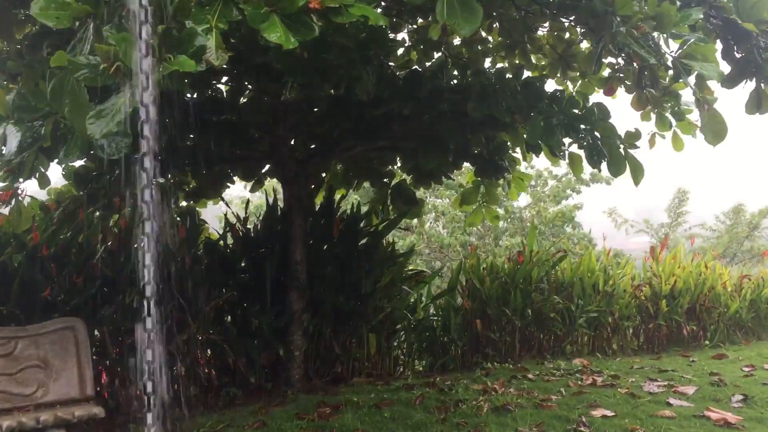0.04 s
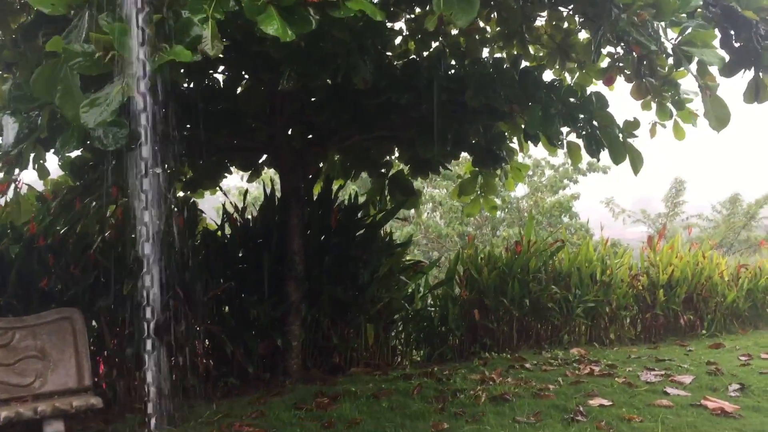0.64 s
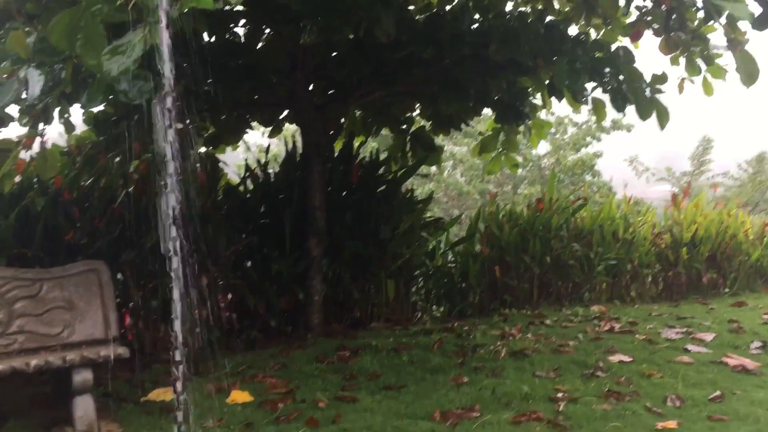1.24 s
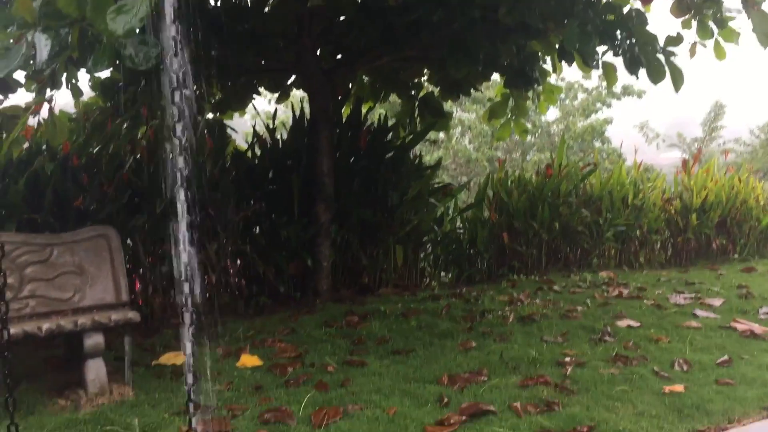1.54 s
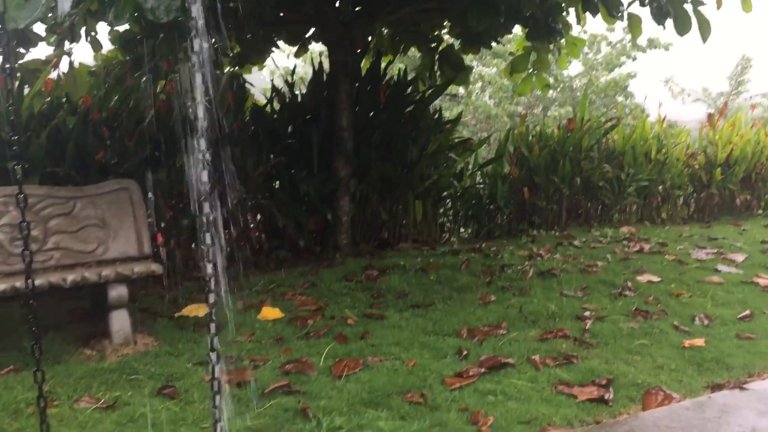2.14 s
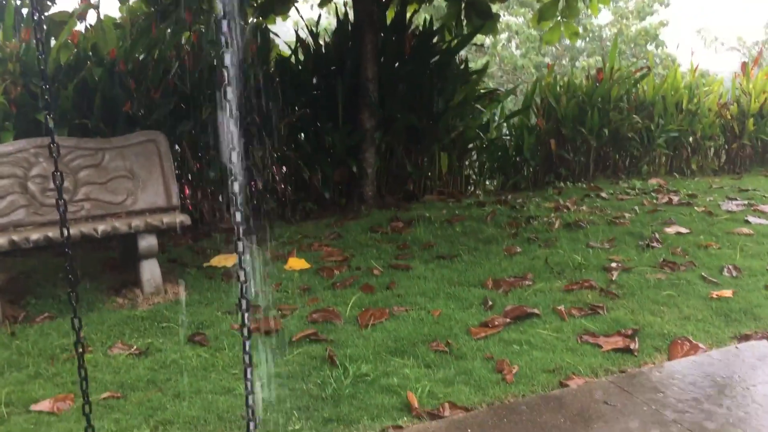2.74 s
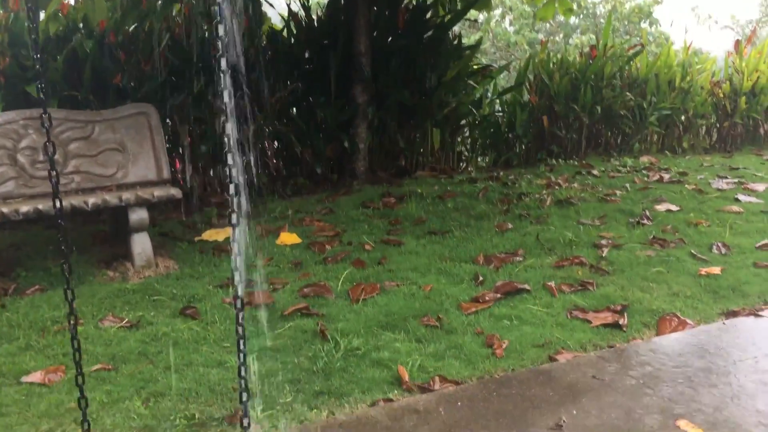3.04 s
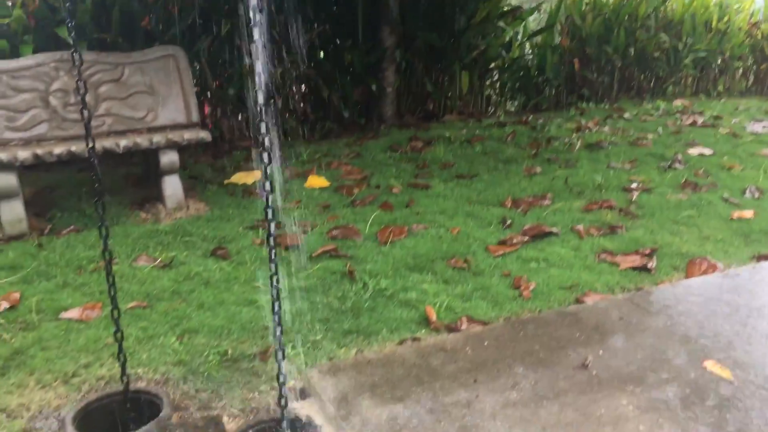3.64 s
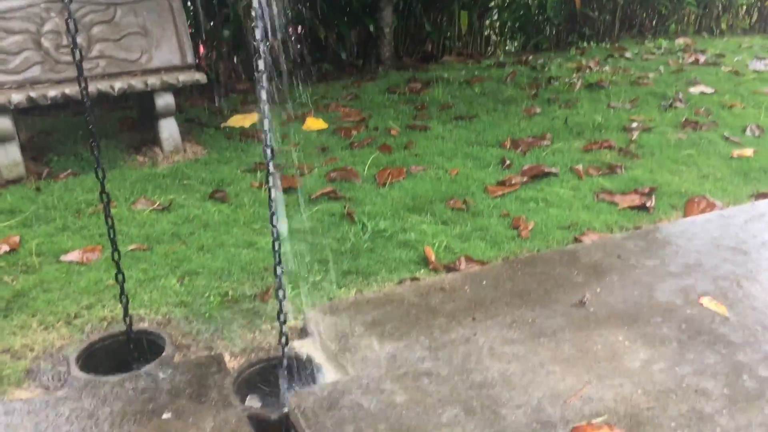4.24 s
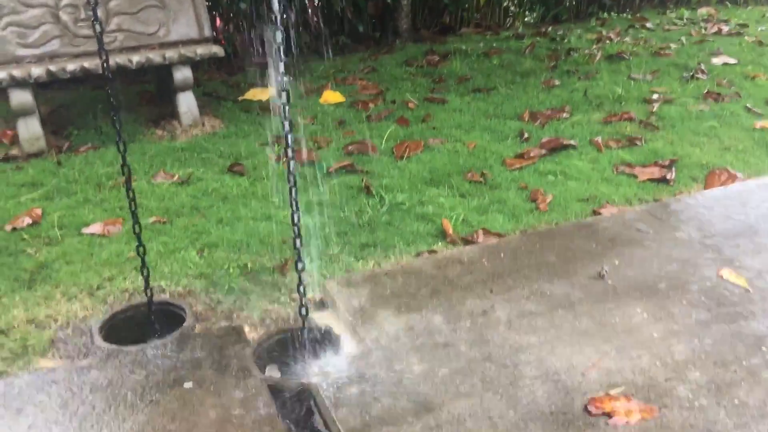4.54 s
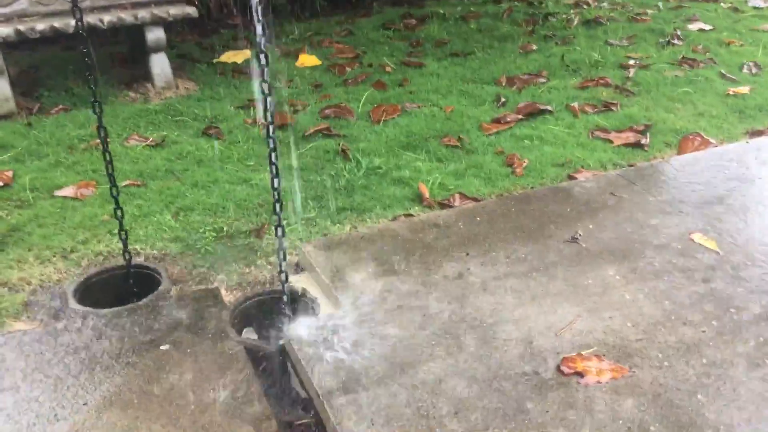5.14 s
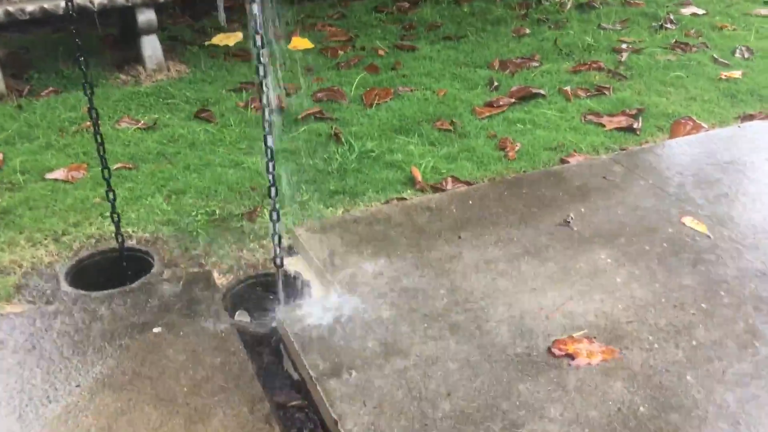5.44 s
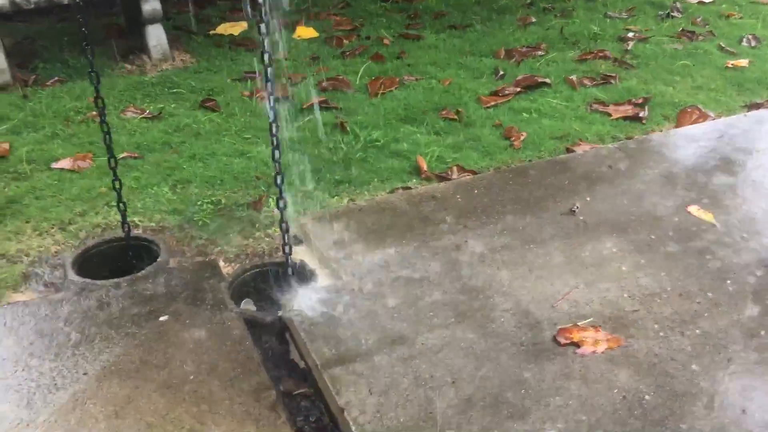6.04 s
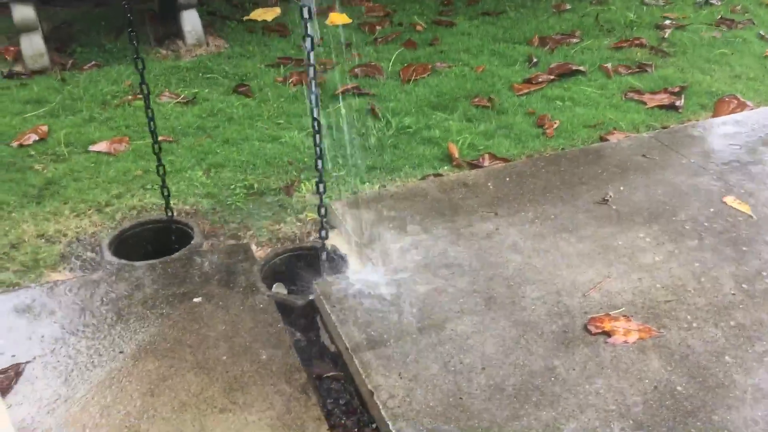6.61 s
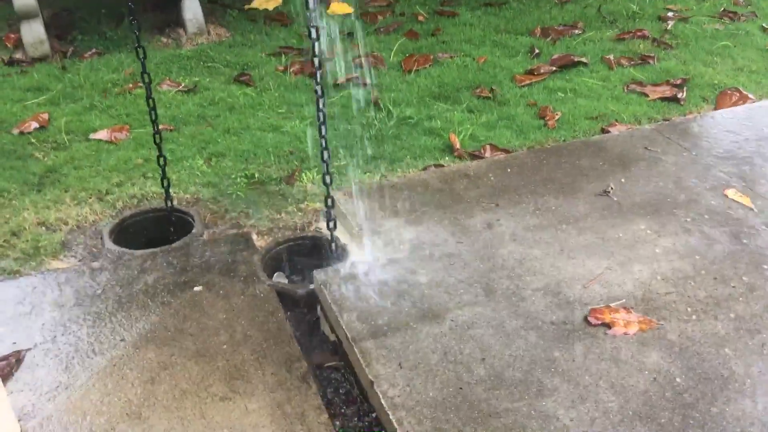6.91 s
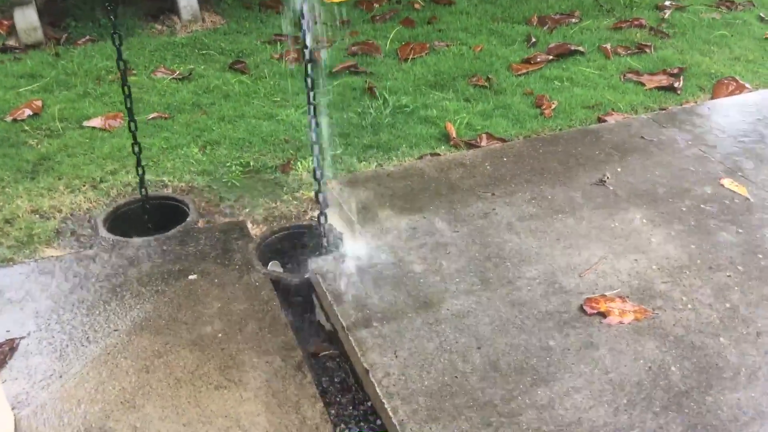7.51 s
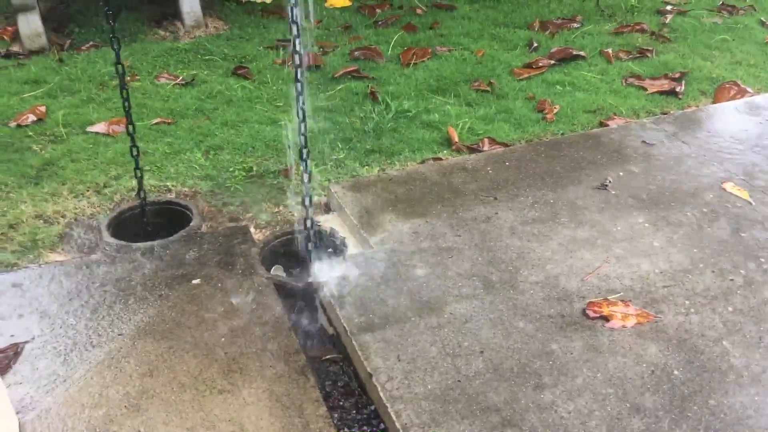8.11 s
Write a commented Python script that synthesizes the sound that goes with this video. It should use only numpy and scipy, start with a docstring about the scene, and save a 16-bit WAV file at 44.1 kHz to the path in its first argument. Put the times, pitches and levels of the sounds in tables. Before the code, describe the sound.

Heavy rain falls on a garden for the whole eight seconds or so, a steady wash of distant drops with nearer ones tapping on leaves and ticking on pavement. Close by, water pours down a rain chain and lands on concrete in quick, irregular wet slaps, each with a bright fizz of spray. Tiny drips and a few bubbly plinks sound in the standing water, mostly in the first two seconds. Between 2 and 3 seconds, light gusts bump the microphone with a low rumble. From about 3 seconds the microphone turns toward the foot of the chain, so the splatter becomes louder and denser by 5 to 6 seconds, while the garden rain fades slightly. Stronger gusts buffet the microphone in fluttering bursts from about 5 seconds, peaking near 8. The rain and splashing continue to the end.

```python
"""Heavy rain falls on a garden throughout: countless far drops merge into a wash, nearer ones tap on leaves
and pavement. Close by, water pours down a rain chain and breaks into blobs that slap the concrete, each
throwing a fizz of spray. After two seconds the first gusts buffet the microphone. From about three
seconds it turns down towards the splash, and the garden fades a little. The gusts return more strongly
from about five seconds and peak near eight."""
import sys
import numpy as np
from scipy import signal
from scipy.fft import rfft, irfft, next_fast_len
from scipy.io import wavfile
from scipy.ndimage import uniform_filter1d, map_coordinates

SR = 44100
rng = np.random.default_rng(int(sys.argv[2]) if len(sys.argv) > 2 else 0)


def log_audio(samples):
    """Write samples as a 16-bit WAV file to the path given in sys.argv[1]."""
    # one column per channel
    frames = np.atleast_2d(samples).T
    # limit to full scale, then quantise
    limited = np.clip(frames, -1, 1)
    pcm = np.round(limited * 32767).astype(np.int16)
    wavfile.write(sys.argv[1], SR, pcm)


N = 369116

# Spectrum of bursting blobs and their fine spray: (frequency [Hz], gain [dB])
TICK_SPECTRUM = [(500, -14), (1300, -9), (2500, -9), (5000, -2.5), (6800, -0.5), (8700, 4), (10800, 1.5),
                 (13300, 13), (16000, -2.5)]
# Spectrum of coarser drops splashing: (frequency [Hz], gain [dB])
SPLATTER_SPECTRUM = [(600, -24), (2000, -12), (3200, 0.5), (4000, 6.5), (5000, 10.5), (6300, -3),
                     (9000, -32), (16000, -25)]
# The microphone's turn from the garden to the foot of the chain: (time [s], facing the splash [0-1])
FACING = [(0, 0.12), (2.9, 0), (4.6, 0.82), (6.3, 1), (8.37, 1)]


def amp(db):
    """Decibels to amplitude ratio."""
    return 10 ** (np.asarray(db) / 20)


def unit(x):
    """Each row normalised to rms 1."""
    return x / np.sqrt(np.mean(x ** 2, axis=-1, keepdims=True) + 1e-20)


def curve(rows):
    """Linear interpolation of (time [s], value) rows at every sample."""
    return np.interp(np.arange(N) / SR, *np.transpose(rows))


def facing(times):
    """Orientation of the microphone at these times: 0 towards the garden, 1 towards the splash."""
    return np.interp(times, *np.transpose(FACING))


def wobble(rate):
    """Smooth random modulation: a spline through rate knots a second."""
    return map_coordinates(rng.standard_normal(int(N * rate / SR) + 4), [np.arange(N) * rate / SR])


def filtered(x, response):
    """Linear filtering: the spectrum of each row is multiplied by a frequency response."""
    length = x.shape[-1]
    padded = next_fast_len(length + min(length, SR // 4))
    return irfft(rfft(x, padded) * response(np.fft.rfftfreq(padded, 1 / SR)), padded)[..., :length]


def coloured(x, spectrum):
    """Spectral shaping by (frequency [Hz], gain [dB]) points, normalised to rms 1."""
    points_hz, level = np.transpose(spectrum)
    return unit(filtered(x, lambda hz: amp(np.interp(np.log(hz + 1), np.log(points_hz), level))))


def placed(times, rows):
    """Superposition of short sounds, one a row, each starting at its time."""
    at = np.maximum(np.round(times * SR).astype(int), 0)[:, None] + np.arange(rows.shape[1])
    return np.bincount(at.ravel(), rows.ravel(), N)[:N]


def rush(patchy_db):
    """Noise modulated in random patches of time and frequency."""
    spectra = signal.stft(rng.standard_normal(N), nperseg=512)[2]
    patches = uniform_filter1d(rng.standard_normal(spectra.shape), size=6, axis=0)
    patches = uniform_filter1d(patches, size=12, axis=1)
    return signal.istft(spectra * amp(patchy_db * patches / patches.std()), nperseg=512)[1][:N]


def drops(rate, centre_hz, octaves, cycles, scatter_db, size):
    """Shot noise: rate random impacts a second, each a damped sinusoid size samples long."""
    when, pitch, weight, phase = rng.random((int(rate * N / SR), 4)).T
    hz = np.minimum(centre_hz * 2 ** (octaves * (2 * pitch - 1)), SR / 2)[:, None]
    turns = hz * np.arange(size) / SR
    gain = amp(-scatter_db * np.log(weight + .01))[:, None]
    envelope = np.exp(-turns / cycles) * (1 - np.exp(-2 * turns))
    ping = np.sin(2 * np.pi * (turns + phase[:, None])) * envelope
    return unit(placed(when * N / SR, gain * ping))


def rain():
    """Far impacts add incoherently into a wash; near ones tap leaves, plink in puddles, tick on paving."""
    wash_spectrum = [(25, -8), (100, -6), (260, -5.5), (450, -2), (680, -2.5), (950, 1), (1400, 1),
                     (1900, -1), (3000, -3.5), (5000, -6.5), (7000, -10), (16000, -24)]  # far rain on leaves and lawn: (frequency [Hz], gain [dB])
    wash = amp(-40 + 0.18 * wobble(6.3)) * coloured(rush(patchy_db=1.2), wash_spectrum)
    leaves = drops(rate=450, centre_hz=1437, octaves=1.08, cycles=1.3, scatter_db=-0.5, size=640)
    plinks = drops(rate=53, centre_hz=2190, octaves=1.224, cycles=11, scatter_db=1.5, size=1024)
    pavement = drops(rate=410, centre_hz=6200, octaves=0.92, cycles=0.43, scatter_db=5.5, size=96)
    garden = wash + amp(-52.5) * leaves + amp(-59) * plinks
    return amp(-1.1 * curve(FACING)) * garden + amp(-52) * pavement


def gust_envelope(start, length, level, rise_s=0.018, fall_s=0.036):
    """Each gust rises exponentially, holds and decays; the strongest at any moment sets the amplitude."""
    t = np.arange(0, N, 128) / SR
    age = t - start[:, None]
    shape = np.exp(np.minimum(age, 0) / rise_s - np.maximum(age - length[:, None], 0) / fall_s)
    return np.interp(np.arange(N) / SR, t, np.max(amp(level)[:, None] * shape, axis=0))


def wind():
    """Turbulence at the microphone port: gusts rumble and shed eddies that flutter higher and faster."""
    rumble_spectrum = [(12, -13), (28, 0.5), (55, 0), (100, -8), (200, -26.5), (400, -45), (2000, -85)]  # buffeting pressure: (frequency [Hz], gain [dB])
    eddy_spectrum = [(40, -16), (75, -2.5), (130, 1), (190, -2), (300, -11), (500, -23), (1500, -48)]  # small eddies: (frequency [Hz], gain [dB])
    gusts = [(2.125, 0.046, -50, -70), (2.22, 0.15, -56, -72), (2.577, 0.049, -51, -72),
             (2.755, 0.06, -45.5, -60), (2.835, 0.07, -43.5, -51), (3.64, 0.04, -53, -68),
             (4.85, 0.49, -48.5, -53.5), (5.244, 0.085, -38, -41.5), (5.343, 0.13, -39, -39),
             (5.539, 0.048, -39, -37.5), (5.643, 0.1, -41.5, -45), (5.863, 0.045, -36.5, -45),
             (5.962, 0.06, -40.5, -41.5), (6.33, 0.02, -45, -46), (6.408, 0.035, -41, -44),
             (6.538, 0.042, -39, -43), (6.599, 0.013, -37.5, -36.5), (6.86, 0.09, -51, -56),
             (7.167, 0.26, -46, -56), (7.63, 0.06, -41, -49), (7.719, 0.095, -40, -40.5),
             (7.923, 0.032, -31, -39), (7.967, 0.1, -36, -31.5), (8.124, 0.097, -41, -46)]  # gusts at the port: (time [s], length [s], rumble level [dB], eddy level [dB])
    start, length, rumble_db, eddy_db = np.transpose(gusts)
    lumps, flutter = unit(amp(1.5 * wobble(30))), unit(amp(2.5 * wobble(70)))
    breeze = amp(-71) + amp(-63) * curve(FACING)  # more of it reaches the port as it turns
    strength = np.maximum(gust_envelope(start, length, rumble_db), breeze)
    rumble = strength * coloured(rng.standard_normal(N), rumble_spectrum)
    eddies = gust_envelope(start, length, eddy_db) * coloured(rng.standard_normal(N), eddy_spectrum)
    return lumps * rumble + flutter * eddies


def bubbles(decay_s=0.0063, rise_per_s=4):
    """Bubble resonance: trapped air rings briefly, its pitch rising as it nears the surface."""
    # Bubbles trapped by big drops in standing water: (time [s], frequency [Hz], level [dB])
    trapped = [(0.52, 1390, -29), (0.569, 1180, -30), (0.738, 2580, -36), (0.937, 2380, -31.5),
               (1.056, 4090, -37), (1.392, 3800, -32), (1.661, 3450, -36), (4.098, 776, -32),
               (7.916, 1180, -31), (8.293, 990, -29.5)]
    times, hz, level = np.transpose(trapped)[..., None]
    t = np.arange(SR // 25) / SR
    envelope = np.exp(-t / decay_s) * (1 - np.exp(-hz * t))
    ring = np.sin(2 * np.pi * hz * t * (1 + rise_per_s * t)) * envelope
    return placed(times[:, 0], amp(level) * ring)


def drips():
    """Air entrainment: stray drops from the chain trap tiny ringing bubbles in the film of water."""
    return amp(-53) * drops(rate=70, centre_hz=3884, octaves=0.44, cycles=12, scatter_db=2, size=640)


def flow(lull_db=-7):
    """Amplitude modulation of the small splashes: they weaken whenever the stream thins."""
    lulls = [(2.15, 0.03), (2.48, .04), (3.35, .04), (4.24, 0.046), (5.315, 0.025), (6.07, .025),
             (6.805, .035), (7.453, 0.029), (7.88, 0.016), (8.223, .02)]  # moments of thin flow: (time [s], half-length [s])
    middle, half_length = np.transpose(lulls)[..., None]
    return amp(lull_db * np.sum(np.exp(-((np.arange(N) / SR - middle) / half_length) ** 2), axis=0))


def stream(surge_db=1.45):
    """Dense impacts of the broken stream fuse into fizz and splatter, both surging with the flow."""
    fizz_spectrum = [(2000, -13), (5000, -25), (7000, -13.5), (8700, -3.5), (10500, 0), (12300, 5),
                     (13500, 8.5), (14800, 7.5), (16000, 2.5)]  # finest droplets: (frequency [Hz], gain [dB])
    steady_spray = [(0.0, -38.5), (3.0, -38.5), (4.17, -37.5), (4.85, -36.5), (5.6, -37), (6.5, -38),
                    (7.34, -37), (7.67, -38), (8.37, -37)]  # spray at the foot of the chain: (time [s], relative level [dB])
    # The stream fans out into extra spray: (time [s], half-length [s], level [dB])
    fan_outs = [(0.843, .05, -39), (3.423, .06, -37), (3.543, 0.033, -38), (3.69, .04, -37),
                (4.336, 0.029, -46), (4.76, .09, -43), (5.08, .06, -44), (5.853, .045, -41),
                (6.473, .1, -35.5), (7.16, .05, -37), (7.91, 0.026, -37)]
    peak, half_length, level = np.transpose(fan_outs)[..., None]
    showers = np.sum(amp(level) * np.exp(-((np.arange(N) / SR - peak) / half_length) ** 2), axis=0)
    surge = amp(surge_db * (wobble(18) + wobble(80)))
    droplets = drops(rate=4000, centre_hz=10500, octaves=.8, cycles=1.2, scatter_db=3.6, size=48)
    fizz = coloured(droplets + rush(patchy_db=2), fizz_spectrum)
    fizz_gain = np.hypot(amp(curve(steady_spray) + 0.5), showers)  # incoherent sources add in power
    splashes = drops(rate=450, centre_hz=3800, octaves=0.67, cycles=3.4, scatter_db=4.5, size=320)
    splatter_gain = amp(-56 + 5 * curve(FACING)) * flow()
    return surge * (fizz_gain * fizz + splatter_gain * coloured(splashes, SPLATTER_SPECTRUM))


def impacts(blobs, slap_top_hz=5900, seethe_s=.004, glint_db=4, size=512):
    """Impact excitation: a blob slaps the water film as it flattens and ticks as it bursts; two tracks."""
    # The hardest blobs burst fastest: (relative tick level [dB], decay time factor [ratio])
    hardness = [(-28, 1), (-19, .55)]
    times, slap_db, slap_hz, tick_db = np.transpose(blobs)
    t = np.arange(size) / SR
    turned, centre = facing(times)[:, None], slap_hz[:, None]
    softness = np.interp(tick_db, *np.transpose(hardness))[:, None]
    decay_s = np.interp(turned, [0, 1], [0.0012, 0.00075]) * softness  # shorter heard head-on
    damping = np.interp(turned, [0, 1], [0.44, 0.25]) / softness

    def burst(fall_s):
        """One exponentially decaying noise pulse per blob."""
        attack = 1 - np.exp(-3 * t / decay_s)
        return unit(rng.standard_normal((len(times), size)) * np.exp(-t / fall_s) * attack)

    def film(hz):
        """The film's heavily damped resonance, broader under a hard blob."""
        loss = 2j * damping * hz * centre
        return (loss / (centre ** 2 - hz ** 2 + loss)) ** 2

    def glint(hz):
        """Spectral ripple of random phase: each tick favours its own parts of the treble."""
        return amp(glint_db * np.sin(2 * np.pi * (hz / 8000 + rng.random((len(times), 1)))))

    flatten = unit(filtered(burst(.5 * decay_s), film))
    seethe = .3 * unit(filtered(burst(seethe_s), film))
    # The blob's weight adds a dull knock, stronger under a low slap: (frequency [Hz], gain [dB])
    thud_spectrum = [(120, -40), (450, -5), (900, -6), (1600, 6), (2400, 2), (5000, -17)]
    weight = (np.median(slap_hz) / centre) ** 2
    thud = amp(-15) * weight * coloured(burst(decay_s), thud_spectrum)
    slap = unit(filtered(flatten + seethe + thud, lambda hz: 1 / (1 + (hz / slap_top_hz) ** 10)))
    snap = burst(.8 * decay_s) + .35 * burst(.003)
    tick = coloured(filtered(snap, glint), TICK_SPECTRUM)
    return placed(times, amp(slap_db)[:, None] * slap), placed(times, amp(tick_db)[:, None] * tick)


def small_splats(count=330, range_db=4, centre_hz=3850, octaves=0.29):
    """Jet break-up: the stream sheds small blobs at a loose beat, too light to throw up spray."""
    slip, weight, pitch, burst = rng.uniform(-1, 1, (count, 4)).T
    times = (np.arange(count) + slip) / count * N / SR
    slap_db = -47.5 + 5 * facing(times) + range_db * weight
    tick_db = -42.5 + 3 * facing(times) + range_db * burst
    slap_hz = centre_hz * 2 ** (octaves * pitch)
    return flow() * sum(impacts(np.transpose([times, slap_db, slap_hz, tick_db])))


def trailing_blobs(leaders, lag_s=.02, softer_db=12, range_db=3, centre_hz=3900, octaves=0.25):
    """Satellite drops: each big blob drags a lighter one that lands a moment later; same columns."""
    times, slap_db, _, tick_db = np.transpose(leaders)
    lag, weight, pitch, burst = rng.uniform(-0.89, 1, (len(times), 4)).T
    return np.transpose([times + lag_s * 2 ** lag, slap_db - softer_db + range_db * weight,
                         centre_hz * 2 ** (octaves * pitch), tick_db - softer_db + range_db * burst])


def airborne(track, decay_s):
    """Amplitude of thrown water: leaky integration of impact energy, dying away as it falls back."""
    fall = np.exp(-np.arange(SR // 4) / SR / decay_s)
    return np.sqrt(np.abs(signal.fftconvolve(track ** 2, fall / fall.sum())[:N]))


def big_splats():
    """Primary and secondary impacts: big blobs hit the concrete, then their spray and drops come down."""
    # Biggest blobs: (time [s], relative slap level [dB], slap frequency [Hz], relative tick level [dB])
    blobs = [(0.072, -37, 2700, -34), (0.095, -46, 4100, -34), (0.275, -51, 2700, -30),
             (0.39, -47, 3700, -33), (0.404, -45, 3900, -28), (0.443, -36, 3500, -28),
             (0.531, -35, 4500, -37), (0.571, -29.5, 2700, -29.5), (0.668, -42, 4200, -31),
             (0.688, -35, 3600, -28), (0.803, -30.5, 3840, -27.5), (0.864, -48, 3800, -26),
             (1.057, -36, 3800, -31), (1.173, -38, 3900, -32), (1.217, -47, 3700, -30),
             (1.363, -37, 3700, -37), (1.41, -43, 3000, -25), (1.495, -36, 4600, -36),
             (1.661, -43, 3400, -28), (1.746, -41, 4400, -33), (1.85, -33, 3300, -27),
             (1.873, -29, 2950, -32), (1.881, -36, 3400, -36), (1.944, -41, 4400, -27),
             (2.071, -34, 3900, -33), (2.228, -41, 4200, -29), (2.236, -33, 4500, -25),
             (2.294, -28, 2500, -35), (2.309, -32, 3600, -31), (2.386, -31, 5030, -24),
             (2.406, -35, 4200, -27.5), (2.512, -33.5, 3180, -42), (2.579, -28.5, 2780, -30),
             (2.63, -31, 3080, -40), (2.75, -34, 4100, -28), (2.835, -32.5, 3600, -30),
             (2.97, -25.5, 2300, -34), (2.989, -33, 3500, -44), (3.12, -30.5, 2680, -46),
             (3.134, -43, 3800, -33), (3.213, -46, 3300, -30), (3.258, -27, 4900, -27),
             (3.407, -38, 4100, -34), (3.417, -33, 3500, -30), (3.441, -29.5, 3900, -39),
             (3.467, -33.5, 3900, -28), (3.523, -36, 4300, -21), (3.563, -48, 4100, -28.5),
             (3.626, -34, 3700, -38), (3.69, -34, 4200, -27.5), (3.709, -32, 3800, -33),
             (3.771, -26.5, 4200, -17), (3.906, -25.5, 3900, -20), (3.943, -28, 3770, -24),
             (3.978, -30, 3800, -36), (4.1, -28.5, 3720, -31), (4.175, -31, 3900, -29),
             (4.323, -43, 4000, -31), (4.341, -27, 3800, -34), (4.367, -31.5, 3500, -38),
             (4.425, -34, 3700, -29), (4.464, -37, 3800, -31), (4.506, -27.5, 3260, -25.5),
             (4.516, -33, 3900, -33), (4.578, -25, 3320, -32), (4.595, -29, 3800, -27),
             (4.635, -32, 3900, -32), (4.648, -35, 3700, -25), (4.714, -40, 3800, -28),
             (4.728, -29.5, 3780, -33), (4.7703, -27.5, 3140, -27.5), (4.834, -30.5, 3630, -34),
             (4.86, -29, 4000, -29), (4.886, -31, 4100, -23.5), (4.908, -28.5, 3800, -32),
             (4.97, -32.5, 3600, -30), (5.035, -29, 3700, -31), (5.074, -32.5, 3600, -31),
             (5.082, -36, 4000, -28), (5.102, -41, 4000, -31), (5.158, -33, 3800, -29),
             (5.201, -33, 3900, -33), (5.254, -36, 4100, -28), (5.364, -35, 4200, -28),
             (5.392, -32, 3600, -29), (5.401, -25.5, 3550, -31), (5.499, -30, 3800, -35),
             (5.509, -26, 4500, -35), (5.577, -30, 4200, -25.5), (5.621, -27.5, 4000, -33),
             (5.676, -33, 3900, -30), (5.747, -30, 3700, -38), (5.759, -26.5, 4430, -31),
             (5.807, -28, 4100, -25), (5.819, -27, 3600, -27.5), (5.848, -43, 4000, -30),
             (5.877, -37, 4400, -28), (5.948, -27.5, 5030, -24), (6.002, -26, 4260, -26),
             (6.036, -31, 3600, -27.5), (6.117, -32, 3800, -28), (6.1577, -22, 4300, -28.5),
             (6.182, -31, 3900, -32), (6.214, -24.5, 3730, -24.5), (6.261, -45, 4100, -29),
             (6.29, -36, 3700, -31), (6.363, -31, 3000, -28), (6.404, -33, 3420, -33),
             (6.425, -35, 4500, -33), (6.465, -29.5, 4300, -36), (6.484, -35, 3800, -31),
             (6.536, -27, 4120, -30), (6.603, -32, 4500, -38), (6.623, -23, 4200, -38),
             (6.66, -29, 4000, -31), (6.671, -25.5, 4000, -35), (6.706, -29, 4100, -33),
             (6.747, -30, 4000, -26.5), (6.846, -36, 4400, -29), (6.866, -21.5, 4550, -31),
             (6.887, -29.5, 3600, -27), (6.958, -27.5, 3920, -26.5), (7.009, -37, 3900, -30),
             (7.035, -37, 3800, -41), (7.078, -37, 4200, -23), (7.091, -30, 4200, -20),
             (7.102, -26, 3650, -27), (7.117, -27.5, 4400, -35), (7.153, -34, 4400, -25),
             (7.171, -27.5, 3400, -33), (7.185, -33, 3300, -25.5), (7.193, -31.5, 3700, -32),
             (7.21, -28, 3520, -42), (7.224, -27, 4200, -34), (7.257, -30, 3400, -37),
             (7.272, -34, 4200, -30), (7.282, -24, 4440, -33), (7.311, -27, 4000, -36),
             (7.322, -26, 4520, -30), (7.396, -25, 3440, -27), (7.408, -31, 3500, -31),
             (7.477, -26.5, 4230, -24.5), (7.54, -28, 3460, -27.5), (7.575, -26, 3730, -32),
             (7.614, -32, 3300, -33), (7.646, -25, 3900, -28), (7.7, -24, 3680, -26),
             (7.757, -24.5, 3400, -28), (7.777, -28.5, 3900, -27), (7.905, -37, 3700, -27),
             (7.913, -32, 4100, -24), (7.979, -27, 3700, -41), (8.012, -26.5, 3770, -34),
             (8.033, -29, 4200, -33), (8.044, -29.5, 3300, -34), (8.097, -33.5, 4400, -28),
             (8.12, -34, 3700, -23), (8.166, -26.5, 4030, -22.5), (8.25, -24, 4740, -27),
             (8.29, -30, 3500, -29), (8.31, -26, 3700, -34), (8.331, -30.5, 3600, -28)]
    slaps, ticks = impacts(np.vstack([blobs, trailing_blobs(blobs)]))
    slaps, ticks = amp(-5) * slaps, amp(-5.5) * ticks
    fine = drops(rate=4200, centre_hz=7650, octaves=1.87, cycles=0.36, scatter_db=5.0, size=48)
    coarse = drops(rate=900, centre_hz=3830, octaves=1.0, cycles=1.8, scatter_db=0.5, size=96)
    ceiling = amp(-27)  # a blob holds only so much water, so its spray saturates
    thrown = ceiling * np.tanh(airborne(ticks + .5 * slaps, decay_s=0.011) / ceiling)
    spray = amp(-5) * thrown * coloured(fine, TICK_SPECTRUM)
    fallback = amp(-9.5) * airborne(slaps, decay_s=0.01) * coloured(coarse, SPLATTER_SPECTRUM)
    return slaps + ticks + spray + fallback


def scene():
    """Superposition in one channel: rain all round, the pouring chain close by, wind on the microphone."""
    return (rain() + stream() + big_splats() + small_splats() + drips() + bubbles() + wind())[None]


def record(dry):
    """Band limiting: an ideal low-pass filter removes everything above 16 kHz."""
    return filtered(dry, lambda hz: hz < 16000)


dry = scene()
out = record(dry)
log_audio(out)
```